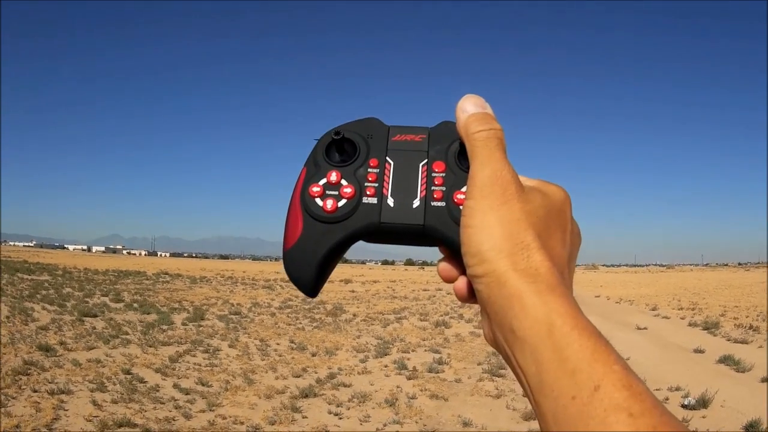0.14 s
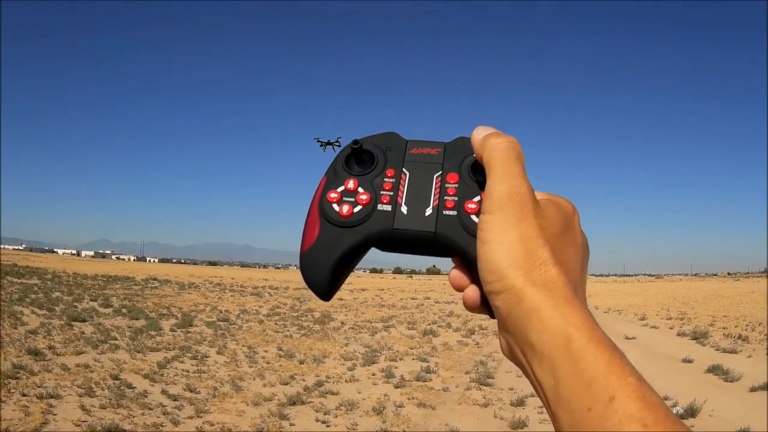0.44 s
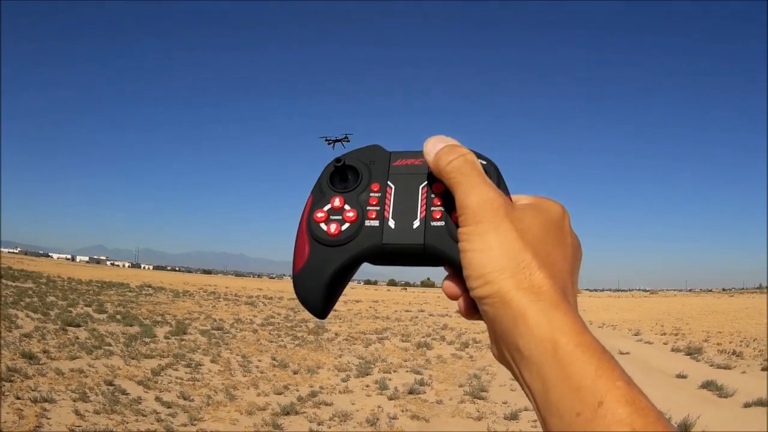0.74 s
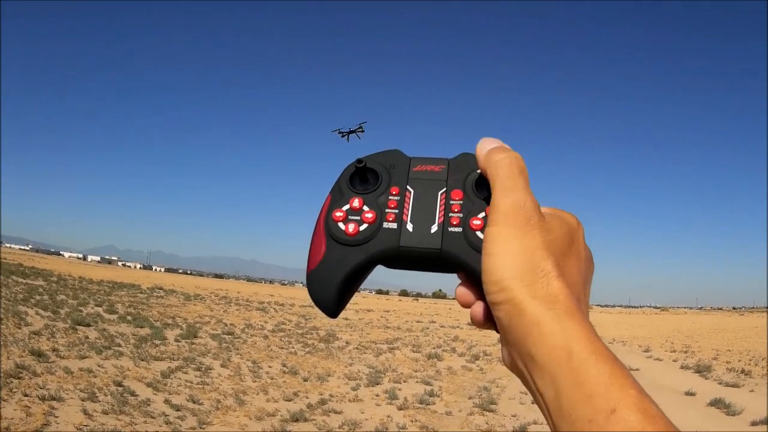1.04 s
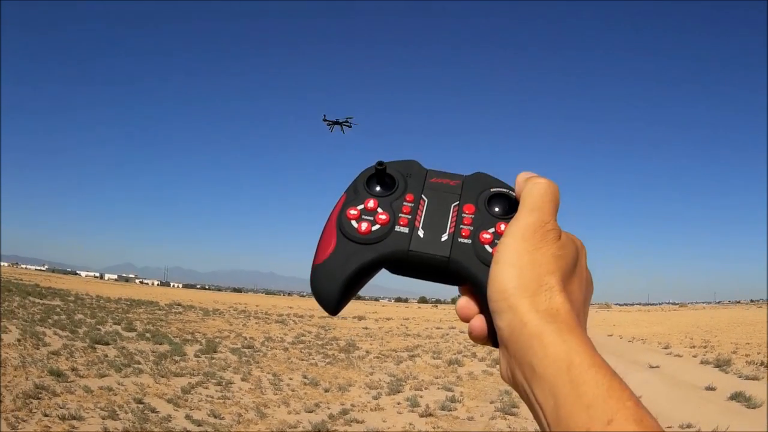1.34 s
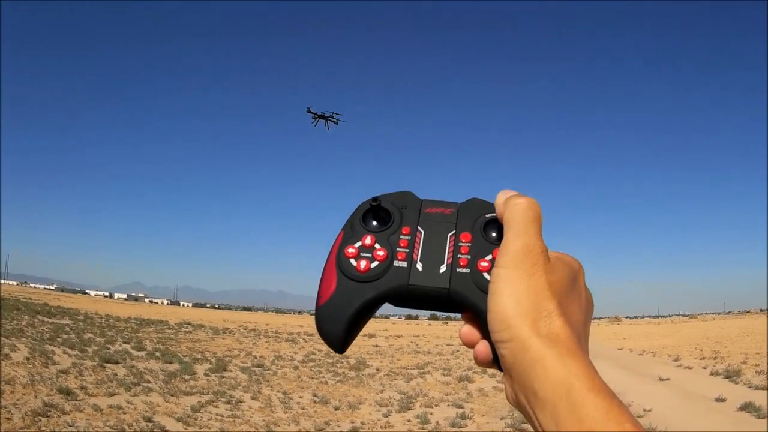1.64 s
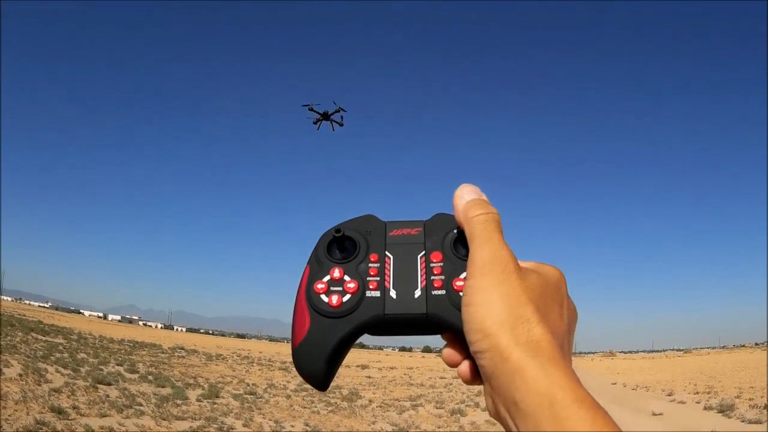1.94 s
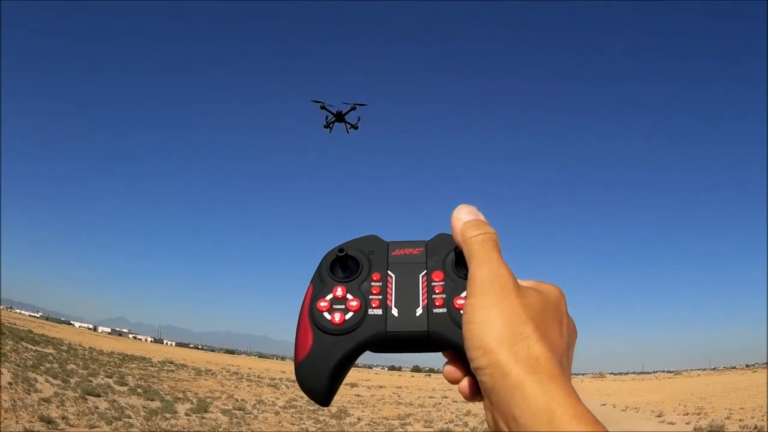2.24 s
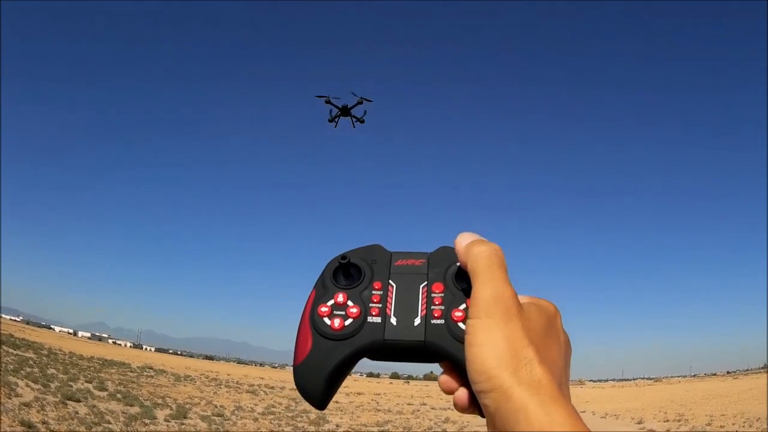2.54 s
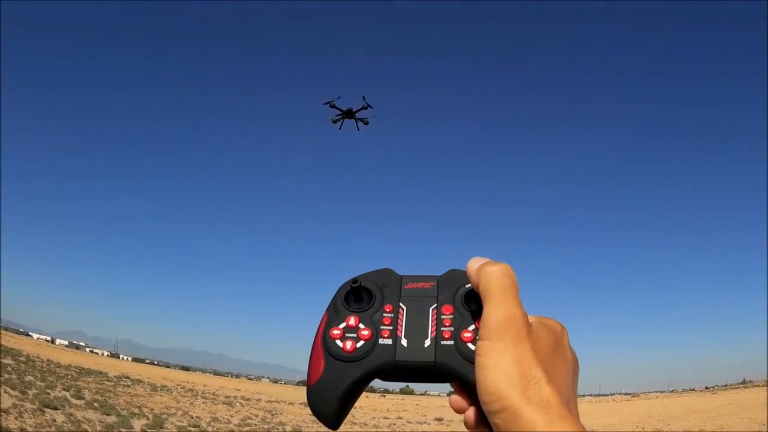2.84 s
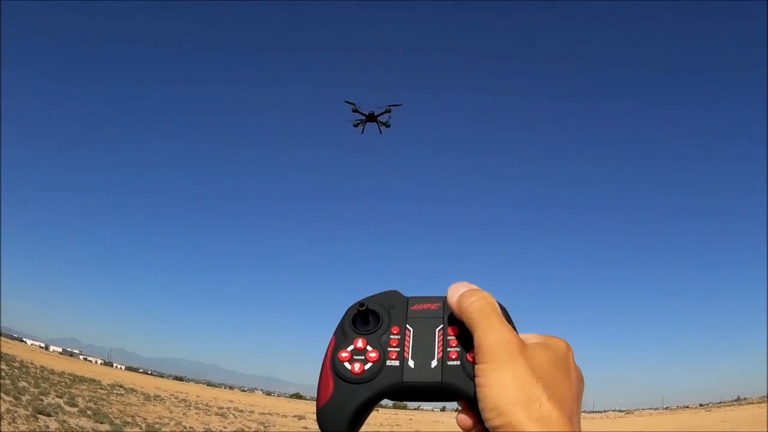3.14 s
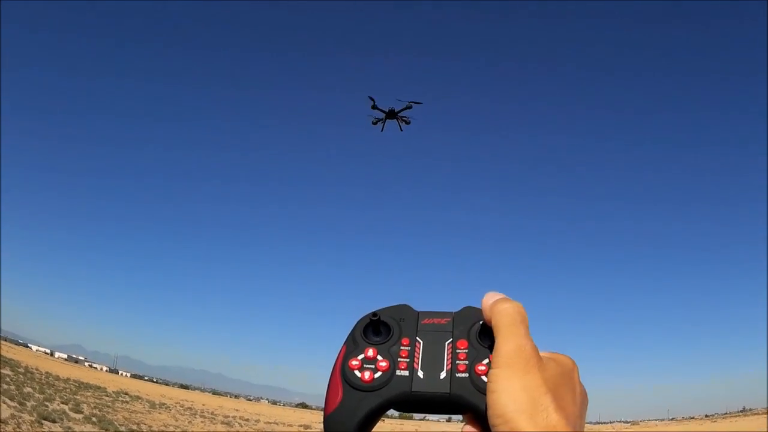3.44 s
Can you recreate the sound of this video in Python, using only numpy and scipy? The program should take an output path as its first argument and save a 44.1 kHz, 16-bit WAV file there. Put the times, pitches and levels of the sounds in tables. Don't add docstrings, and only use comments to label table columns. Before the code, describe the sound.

A toy quadcopter hovers with a high, warbling motor whine and rattling propeller buzz over low, lumpy wind in open desert. Two small plastic stick clicks come early; then it drifts nearer, louder and rougher at the microphone.

```python
import sys
import numpy as np
from scipy import signal
from scipy.fft import rfft, irfft, next_fast_len
from scipy.io import wavfile
from scipy.ndimage import uniform_filter1d, map_coordinates

SR = 44100
rng = np.random.default_rng(int(sys.argv[2]) if len(sys.argv) > 2 else 0)


def to_wav(s):
    ch = np.atleast_2d(s).T
    pcm = np.round(np.clip(ch, -1, 1) * 32767)
    wavfile.write(sys.argv[1], SR, pcm.astype(np.int16))


def ratio_of_db(decibels):
    return 10 ** (np.asarray(decibels, float) / 20)


N = 158760

# (time [s], mesh pitch [Hz], tone [dB], octave [dB])
FRONT_LEFT = [(0,3740,-3,1),(.1,3710,-6,-1),(.14,3780,-16,-2),(.2,3660,-6,-10),(.32,3830,-14,-12),(.4,3550,-13,-10),(.57,3570,-16,-3),(.7,3620,-12,-10),(.83,3490,-7,-6),(1.09,3560,-1,-1),
              (1.135,3900,-15,-7),(1.2,3800,-14,-6),(1.31,3550,-15,-12),(1.45,3620,-5,-10),(1.7,3620,-9,-14),(1.8,3600,-24,-24),(1.88,3580,-8,-20),(1.96,3560,-7,-20),
              (2.1,3650,-12,-14),(2.18,3760,-5,-8),(2.3,3941,-7,2),(2.44,3879,-7,4),(2.5,4110,-9,0),(2.6,3800,-22,-16),(3.6,3790,-22,-16)]
FRONT_RIGHT = [(0,3450,-12,2),(.14,3505,-18,-3),(.23,3440,-18,1),(.28,3270,-3,-6),(.33,3300,-4,-1),(.38,3500,-9,-3),(.55,3430,-7,-1),(.62,3370,-10,1),(.66,3230,-12,-6),
               (.7,3480,-11,3),(.93,3330,-12,2),(.98,3280,-1,1),(1.08,3270,-1,1),(1.13,3420,-10,-3),(1.22,3300,-22,-16),(1.27,3170,-4,0),(1.33,3200,-4,0),(1.38,3280,-14,0),
               (1.45,3190,-1,-4),(1.6,3250,-3,-2),(1.7,3230,-8,-3),(1.76,3180,-22,-12),(1.9,3130,-6,-12),(1.97,3150,-8,-8),(2,3200,3,-2),(2.08,3215,2,-2),(2.21,3390,1,-1),(2.3,3480,-8,-12),
               (2.4,3520,-18,-20),(2.72,3520,-20,-12),(2.8,3500,-6,-4),(2.9,3520,-20,-8),(3.07,3510,-7,-8),(3.15,3500,-16,-10),(3.27,3500,-9,-7),(3.34,3650,-5,-12),(3.4,3520,-16,-12),(3.6,3500,-10,-10)]
REAR_LEFT = [(0,2800,-12,-20),(.25,2790,-9,-20),(.3,2800,-22,-20),(1.24,2750,-20,-25),(1.27,2680,0,-25),(1.3,2700,-18,-25),(1.46,2730,-9,-25),(1.66,2720,-16,-25),
             (1.7,2900,-3,-12),(1.73,3050,-1,-6),(1.8,3450,0,-1),(1.85,3470,-10,-14),(1.9,3450,-24,-24),(2.15,3560,-22,-24),(2.2,3600,-7,-14),(2.28,3650,-7,-14),(2.33,3600,-6,-14),
             (2.43,3600,-4,-12),(2.49,3820,-8,-12),(2.57,3750,-6,-12),(2.68,3340,-9,-2),(2.75,3360,-5,-2),(2.82,3350,-12,-2),(2.88,3360,-4,-2),(3.1,3360,-12,0),
             (3.2,3390,-5,1),(3.3,3240,-3,3),(3.35,3330,-6,0),(3.4,3640,-13,-8),(3.43,3400,-5,-6),(3.55,3270,-5,-3),(3.6,3150,-3,-1)]
REAR_RIGHT = [(0,3250,-26,-8),(.6,3150,-18,-10),(.84,3170,-10,-10),(.9,3120,-20,-3),(1.05,3080,-20,-8),(1.38,3000,-12,-16),(1.45,3400,-34,-28),(1.57,3760,-28,-6),(1.62,3810,-4,3),
              (1.7,3900,-13,2),(1.75,3850,-18,-6),(1.82,3100,-30,-28),(1.9,2800,-8,-20),(1.97,2760,-7,-20),(2.1,2950,-16,-16),(2.18,3020,-3,-14),(2.25,3000,-18,-20),(2.45,3150,-12,-14),
              (2.6,3100,-22,-14),(2.78,3010,-6,-10),(2.9,3080,-9,-6),(2.97,3200,-3,-2),(3.04,3020,-2,-6),(3.09,3060,-12,-12),(3.13,3020,-3,-6),(3.17,3200,1,0),(3.22,3250,-14,-6),
              (3.36,3050,-14,-10),(3.42,3060,-3,-3),(3.46,3180,-3,-3),(3.6,3050,-11,-8)]
# (time [s], nearness [dB], blade load [dB])
FLIGHT = [(0, -51, -10), (.28, -50, -8.5), (.55, -49.5, -14), (.95, -50.5, -12), (1.27, -48.5, -8.5),
          (1.5, -49, -13), (1.62, -46, -12), (1.78, -44.5, -11.5), (1.85, -47, -10.5), (2.15, -42, -9),
          (2.27, -44.5, -7), (2.36, -41, -5.5), (2.6, -40, -5.5), (2.66, -43.5, -13), (2.82, -39.5, -7.5),
          (3.35, -40.5, -13), (3.47, -39, -8), (3.6, -40, -9)]
CHOP_SHARE_DB = [0.4, -14.5, -4, -17.5]
SHAFT_SHARE_DB = [-3, 5, -2, -4]
# (centre [Hz], width [Hz], level [dB])
HOUSING = [(1628, 350, -6.5), (2130, 385, -5), (3146, 920, -6), (4440, 1230, -13.5), (6570, 1200, -3.5),
           (7850, 360, -5.5), (9780, 680, -18), (11570, 2500, -21), (14350, 1100, -19.5)]
# (frequency [Hz], level [dB])
BLADE_AIR = [(150, -35), (300, -10.5), (600, -3), (1200, -3), (2200, -1), (4000, -6), (9000, -17.5),
             (16000, -46)]
# (time [s], level over nearness [dB])
FLUTTERS = [
    (.29, 1),
    (.47, -1),
    (0.677, 3),
    (.85, 0.5),
    (1.27, -1),
    (2.59, -2.5),
    (2.78, 0.5),
    (3.015, 1),
    (3.43, 2.5),
]
# (frequency [Hz], level [dB per Hz])
RUMBLE = [(12, -52), (20, -5), (104, 0), (143, -2), (182, -5.5), (350, -18), (555, -19), (944, -38),
          (1200, -32), (1560, -73), (2640, -120)]
# (pitch [Hz], wander [Hz], level [dB])
DRONES = [(103.9, 10, -58.5), (174.9, 5.8, -61.5)]
# (time [s], level [dB])
PUFFS = [
    (1.0, -62),
]
# (time [s], peak level [dB])
CLICKS = [
    (.6195, -27),
    (1.1687, -30.5),
]
# (frequency [Hz], level [dB], decay to -60 dB [s])
STICK = [(1250, -7, .022), (1600, -6, .009), (2040, 2, .009), (3050, -9, .011)]
# (time [s], gain of weak parts [dB])
DROPOUTS = [
    (.558, -26),
    (1.819, -26),
    (1.924, -24),
    (2.778, -20),
    (2.862, -18),
    (3.418, -22),
]

TEETH_PER_BLADE, PINION_TEETH = 25.6, 6.8
WARBLE_RAD, THROB = .42, .14
WANDER_RAD, WANDER_HZ = .62, 70
ROUGHENS, LOPE = .09, .05
SHAFT_DB, SHAFT_GROWS = -29, .3
RATTLE_DB, RATTLE_GATE = .5, .24
FAR_TILT = .16
SWISH_DB, SWISH_GATE = 2.5, .23
CHOP_DB, CHOP_GROWS, THUMP_DB = -4, 2.13, -3
FLUTTER_S, PUFF_S = .011, .078
RUMBLE_DB, HISS_DB = -50.5, -78
STICK_RISE_S = .0003
DROPOUT_S, KEPT_SHARE = .009, .14
MIC_TOP_HZ, MIC_FALL_DB = 14800, -70


def unit(x):
    return x / np.sqrt(np.mean(x ** 2) + 1e-20)


def along(points, hz):
    f, v = np.transpose(points)
    return np.interp(np.log(hz + 1), np.log(f + 1), v)


def curves(rows):
    s, *cols = np.transpose(rows)
    return [np.interp(np.arange(N) / SR, s, c) for c in cols]


def wobble(rate):
    coarse = np.arange(0, N + 64, 64)
    knots = rng.standard_normal(500)
    return np.interp(np.arange(N), coarse, map_coordinates(knots, [coarse * rate / SR]))


def filtered(x, response):
    m = next_fast_len(N + 8192)
    return irfft(rfft(x, m) * response(np.fft.rfftfreq(m, 1 / SR)), m)[:N]


def patchy(depth_db):
    z = signal.stft(rng.standard_normal(N), nperseg=512)[2]
    field = uniform_filter1d(rng.standard_normal(z.shape), size=7, axis=0)
    field = uniform_filter1d(field, size=9, axis=1)
    return signal.istft(z * ratio_of_db(depth_db * unit(field)), nperseg=512)[1][:N]


def bumps(events, half_s):
    t = np.arange(N) / SR
    return sum(ratio_of_db(db) * np.exp(-((t - s) / half_s) ** 2) for s, db in events)


def housing(hz):
    return np.sqrt(sum(ratio_of_db(2 * db) / (1 + (2 * (hz - c) / w) ** 2) ** 2 for c, w, db in HOUSING))


def blade_air(hz):
    return ratio_of_db(along(BLADE_AIR, hz))


def motor(rows, chop_db, shaft_db, lift_db, nearer_db):
    mesh_hz, tone_db, octave_db = curves(rows)
    turn = 2 * np.pi * np.cumsum(uniform_filter1d(mesh_hz, size=800)) / SR
    blade = turn / TEETH_PER_BLADE + 2 * np.pi * rng.random()
    closer_db = np.clip(nearer_db, 0, None)

    drift = (WANDER_RAD + ROUGHENS * closer_db) * wobble(WANDER_HZ)
    mesh = turn + WARBLE_RAD * np.sin(blade) + .043 * np.sin(blade / 2) + drift
    lope = LOPE * closer_db * (np.cos(blade / 2) + np.cos(blade))
    tones = ratio_of_db(tone_db + 3.2 * wobble(40) - 1.2) * np.sin(mesh)
    tones = tones + ratio_of_db(octave_db + 3.6 * wobble(60) - 1.2) * np.sin(2 * mesh)
    tones = tones * (1 + THROB * np.cos(blade) + lope)

    for k, db in [(1, 3), (3, 1.5), (4, 1.5)]:
        level = ratio_of_db(SHAFT_DB + shaft_db + SHAFT_GROWS * nearer_db + db + 4.7 * wobble(21.97))
        tones = tones + level * np.sin(k * (turn / PINION_TEETH + .24 * wobble(15)))

    beat = np.exp(1.5 * np.cos(blade))
    beat = beat / beat.mean() - 1
    rattle = (1 + RATTLE_GATE * beat + lope) * rng.standard_normal(N)
    swish = (1 + SWISH_GATE * beat) * rng.standard_normal(N)

    pulse = np.exp(130 * (np.cos(blade + .014 * wobble(40)) - 1))
    chop = unit(pulse - pulse.mean()) + ratio_of_db(THUMP_DB) * np.sin(2 * blade)
    chop = ratio_of_db(chop_db + CHOP_GROWS * lift_db + 2.5 * wobble(30)) * chop
    return np.array([tones, rattle, swish, chop])


def quadcopter():
    near_db, load_db = curves(FLIGHT)
    nearer_db = near_db - near_db.mean()
    lift_db = load_db - load_db.mean()
    arms = zip((FRONT_LEFT, FRONT_RIGHT, REAR_LEFT, REAR_RIGHT), CHOP_SHARE_DB, SHAFT_SHARE_DB)
    tones, rattle, swish, chop = sum(motor(*arm, lift_db, nearer_db) for arm in arms)

    rattle = unit(filtered(rattle + 2 * patchy(depth_db=4), housing))
    top = filtered(rattle, lambda hz: hz > 8600)
    rattle = rattle + top * (ratio_of_db(FAR_TILT * nearer_db + .43 * wobble(24.7)) - 1)

    flutter = unit(filtered(swish, lambda hz: 1 / (1 + ((hz - 2300) / 800) ** 4)))
    flutter = bumps(FLUTTERS, FLUTTER_S) * flutter
    swish = unit(filtered(swish + 1.32 * patchy(depth_db=5), blade_air))
    swish = flutter + ratio_of_db(load_db + SWISH_DB + 1.55 * wobble(18)) * swish

    chop = ratio_of_db(load_db.mean() + CHOP_DB) * filtered(chop, blade_air)
    gusts = ratio_of_db(.5 * wobble(13) + .9 * wobble(30))
    return ratio_of_db(near_db) * (tones + gusts * (ratio_of_db(RATTLE_DB) * rattle + swish) + chop)


def wind():
    rumble = unit(filtered(patchy(depth_db=1.44), lambda hz: ratio_of_db(along(RUMBLE, hz))))
    out = ratio_of_db(RUMBLE_DB - .5 + .88 * wobble(6.25)) * rumble
    t = np.arange(N) / SR
    for hz, wander, db in DRONES:
        cycles = hz * t + np.cumsum(wander * wobble(8)) / SR / 2
        out = out + ratio_of_db(db + 1.4 * wobble(6.7)) * np.sin(2 * np.pi * cycles)
    hiss = unit(filtered(patchy(depth_db=1.5), lambda hz: hz > 5000))
    puff = unit(filtered(hiss, lambda hz: 1 / (1 + ((hz - 10100) / 900) ** 2)))
    return out + ratio_of_db(HISS_DB) * hiss + bumps(PUFFS, PUFF_S) * puff


def stick():
    out, t = np.zeros(N + SR), np.arange(SR // 20) / SR
    for s, db in CLICKS:
        softer_db = db - CLICKS[0][1]
        ring = 0
        for hz, mode_db, t60 in STICK:
            level_db = mode_db - 60 * t / t60 + softer_db * np.log2(hz / 1500)
            ring = ring + ratio_of_db(level_db) * np.sin(2 * np.pi * hz * t)
        out[round(s * SR):][:len(t)] += ratio_of_db(db) * 2 * ring * (1 - np.exp(-t / STICK_RISE_S))
    return filtered(out[:N], lambda hz: (1j * hz / (900 + 1j * hz)) ** 3)


def scene():
    return (quadcopter() + wind() + stick())[None]


def roll_off(x):
    return signal.sosfilt(signal.butter(12, 16080, fs=SR, output="sos"), x)


def record(dry):
    def mic(hz):
        return ratio_of_db(MIC_FALL_DB * np.clip(hz - MIC_TOP_HZ, 0, None) ** 1.9 / 27000)

    heard = filtered(dry[0], mic)[None]
    t, z = signal.stft(heard, SR, nperseg=768, noverlap=704)[1:]
    level_db = 10 * np.log10(uniform_filter1d(np.abs(z) ** 2, size=9, axis=2) + 1e-20)
    strong_db = np.quantile(level_db, 1 - KEPT_SHARE, axis=1, keepdims=True)
    weak = 1 / (1.5 + np.exp(level_db - strong_db))
    loss_db = sum(db * np.exp(-((t - s) / DROPOUT_S) ** 4) for s, db in DROPOUTS)
    mix = signal.istft(z * ratio_of_db(weak * loss_db), SR, nperseg=768, noverlap=704)[1][:, :N]
    return roll_off(mix)


dry = scene()
out = record(dry)
to_wav(out)
```